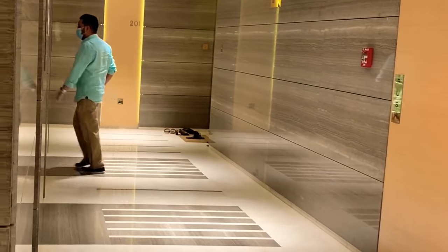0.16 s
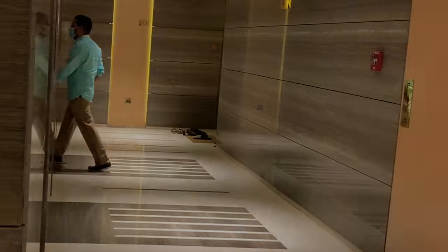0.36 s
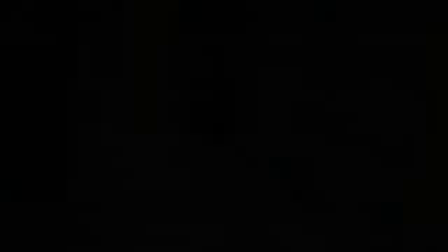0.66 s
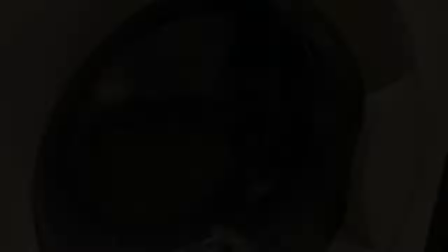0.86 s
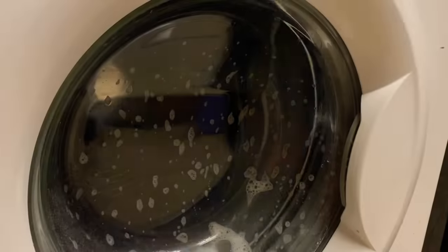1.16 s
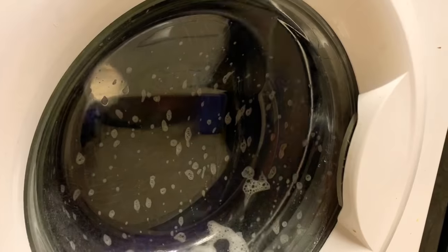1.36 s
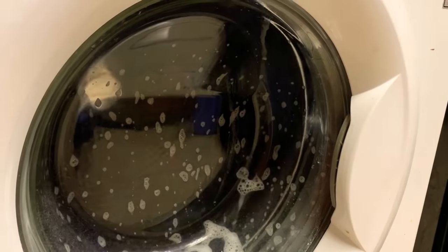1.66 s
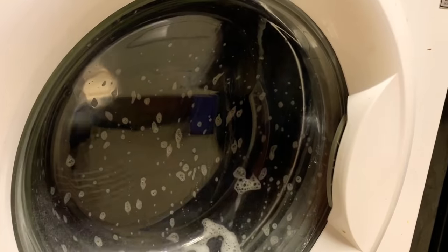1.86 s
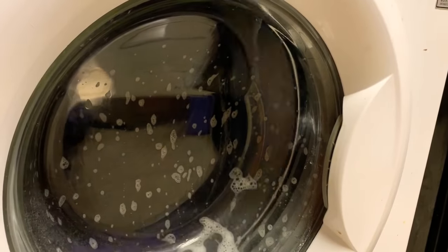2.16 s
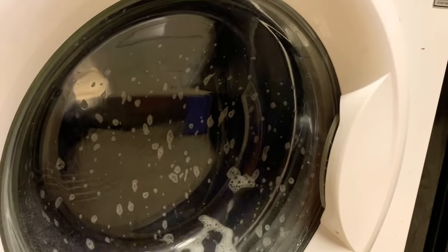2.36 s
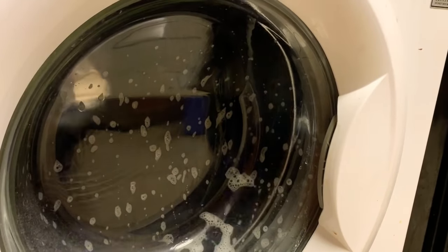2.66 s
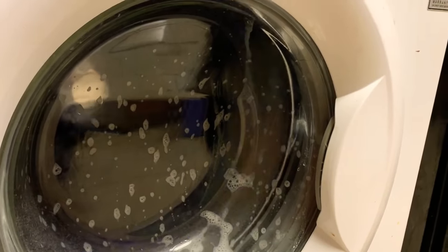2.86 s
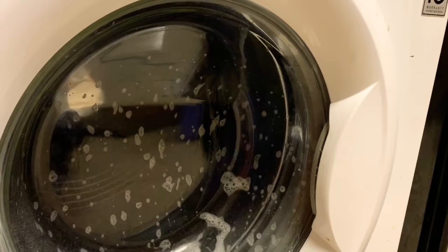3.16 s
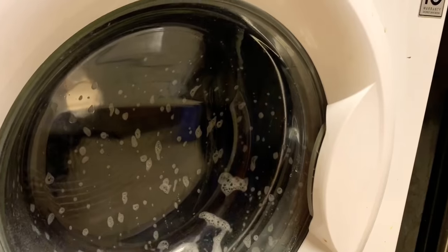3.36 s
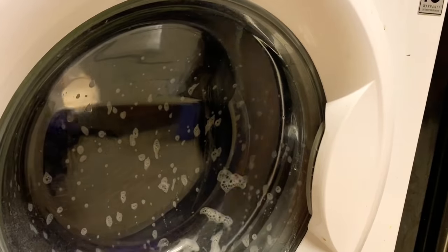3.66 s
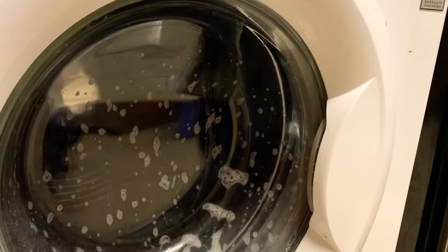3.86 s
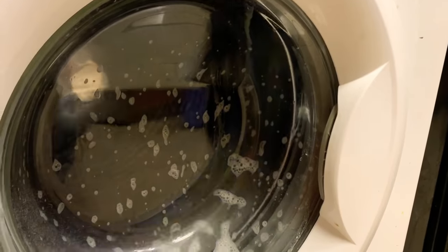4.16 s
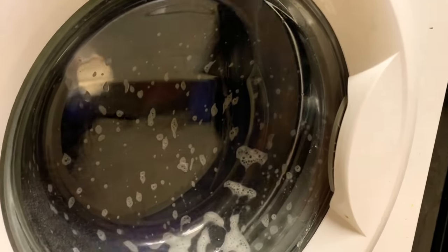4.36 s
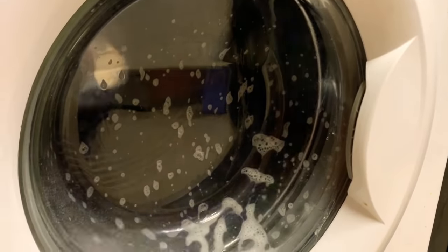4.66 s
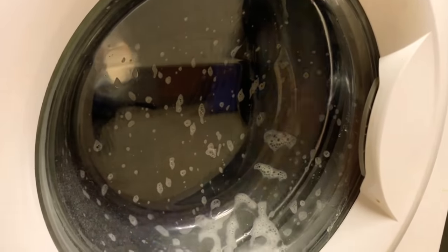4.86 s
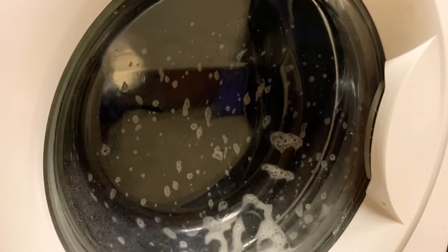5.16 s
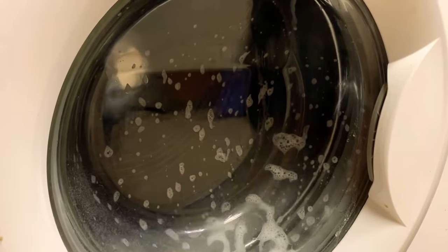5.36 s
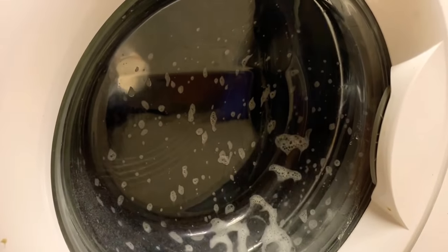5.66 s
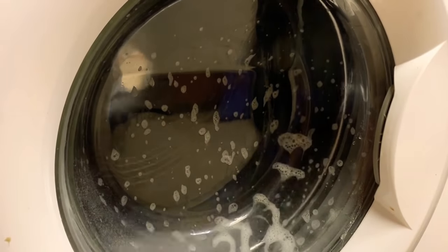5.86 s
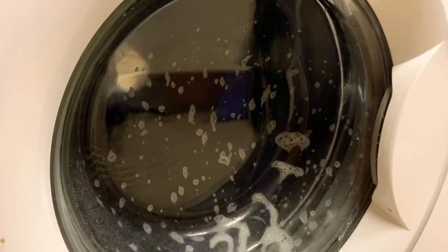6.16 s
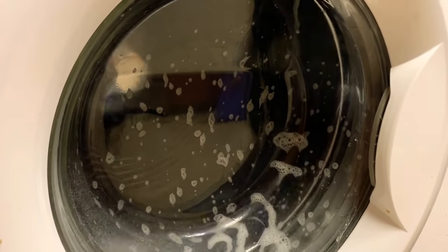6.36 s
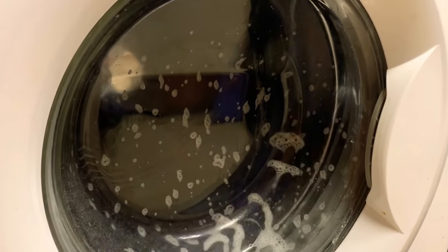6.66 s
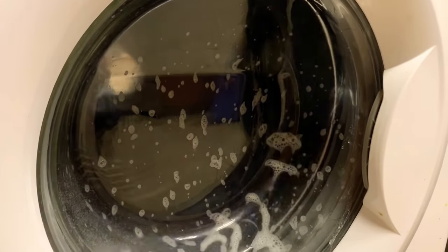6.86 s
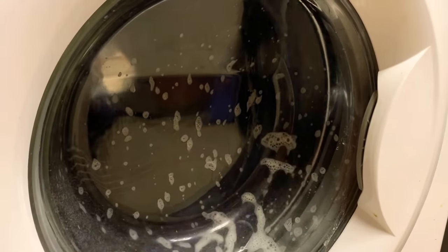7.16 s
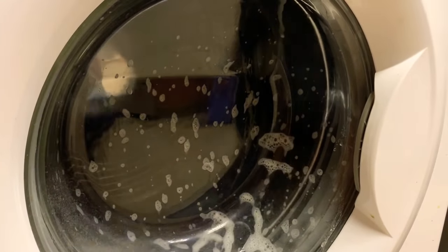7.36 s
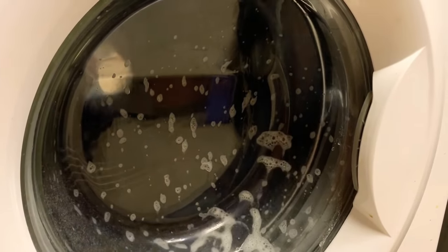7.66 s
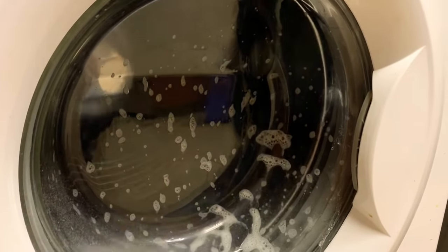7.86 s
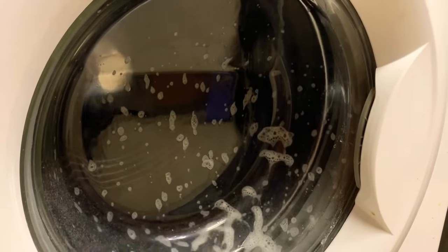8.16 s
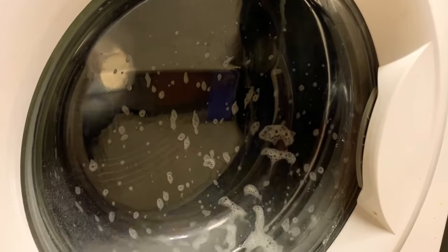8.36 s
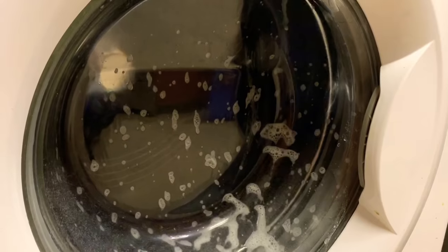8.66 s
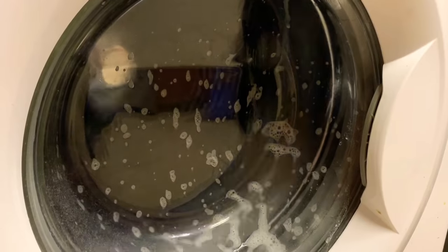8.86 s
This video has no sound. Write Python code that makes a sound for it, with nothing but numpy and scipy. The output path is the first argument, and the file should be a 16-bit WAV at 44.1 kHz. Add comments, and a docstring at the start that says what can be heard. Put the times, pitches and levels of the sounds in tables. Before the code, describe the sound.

Silence until about 0.8 s, then a very quick fade-in to a front-loading washer already spinning, heard close to its door in stereo. A low cabinet drone throbs about eleven times a second, creeping to just over twelve by the end at 9 s. Around it lie steady rumble, airy bearing roar, hollow metallic panel resonances and a thin motor whine near 400 Hz, weakening after 5 s. Fine bright ticks and hissing puffs recur each turn. From 2.9 to 7.2 s a pulsing seal scrape swells, strongest near 4.3 s. A single click comes at 4.5 s. Around 5 s a low electrical hum rises quickly and keeps growing. A loose part buzzes briefly at 5.3 s, then from 5.5 to 7.2 s with sharp irregular rattles; scattered clacks and shorter buzzes follow to the end, while door knocks strengthen.

```python
"""Washer spinning up

A front-loading washer speeds up its spin, heard from close to the door after a silent start and a short fade-in.
Impulses locked to drum angle ring the modes of cabinet, panels and door: the unbalanced tub jolts each turn.
Shaped noise makes the roar of air and bearings, the throbbing drum shell and the hiss of the seal, which ticks.
A loose part buzzes in spells, as taps and scratches through damped modes, over sine lines of mains hum.
"""
import sys
import numpy as np
from scipy import signal
from scipy.fft import rfft, irfft, next_fast_len
from scipy.io import wavfile
from scipy.ndimage import uniform_filter1d

SR = 44100
rng = np.random.default_rng(int(sys.argv[2]) if len(sys.argv) > 2 else 0)


def unload_wav(signal):
    """Save mono or channel-first audio to the path in sys.argv[1] as 16-bit WAV at rate SR, clipped to [-1, 1]."""
    wavfile.write(
        sys.argv[1],
        SR,
        np.round(np.clip(np.atleast_2d(signal).T, -1, 1) * 32767).astype(np.int16),
    )


def how_loud(loudness_db):
    """Turn decibels into a plain amplitude multiplier (0 dB gives 1, 20 dB gives 10)."""
    steps = np.asarray(loudness_db, float) / 20
    return 10 ** steps


N = 397341  # length [samples]


def evened(x):
    """Normalization: scales a signal to rms 1."""
    return x / np.sqrt(np.mean(x ** 2) + 1e-20)


def read(points, hz):
    """Spectral interpolation: reads a (frequency, value) table on a log-frequency axis."""
    f, value = np.transpose(points)
    return np.interp(np.log(hz + 1), np.log(f + 1), value)


def curve(table, axis):
    """Linear interpolation: one column of a time table at every sample, held beyond its ends."""
    rows = np.array(table)
    return np.interp(np.arange(N) / SR, rows[:, 0], rows[:, axis])


# drum speed: (time [s], rate [turns/s])
DRUM_SPEED = [(0.8, 10.890), (2.0, 11.158), (3.5, 11.427), (5.0, 11.675), (6.5, 11.904), (8.0, 12.121),
              (9.01, 12.260)]


def turns():
    """Rotation: drum angle [turns] is the integral of speed, zero at the first row's time."""
    angle = np.cumsum(curve(DRUM_SPEED, axis=1)) / SR
    return angle - angle[round(DRUM_SPEED[0][0] * SR)]


def speed_share():
    """Relative speed: 0 at the lowest drum speed, 1 at the highest."""
    lowest, highest = DRUM_SPEED[0][1], DRUM_SPEED[-1][1]
    return (curve(DRUM_SPEED, axis=1) - lowest) / (highest - lowest)


def grown(level, law=1):
    """Speed-dependent excitation: level is (dB at the lowest speed, dB gained at the highest)."""
    return level[0] + level[1] * speed_share() ** law


def wandering(angle, spread):
    """Angular jitter: shifts the angle by random amounts, one per turn, joined by straight lines."""
    shifts = rng.standard_normal(200)
    return angle + spread * np.interp(angle, np.arange(-20, 180), shifts)


def jolts(angle, table, spread):
    """Periodic excitation: an impulse at each passage of a tabled angle, its size scattered by spread."""
    train = np.zeros(N)
    for turn, push in table:
        passed = np.floor(angle - turn)
        train += push * np.diff(passed, prepend=passed[0])
    return train * (1 + spread * rng.standard_normal(N))


def ring(modes):
    """Modal response: decaying sines (frequency [Hz], swing, t60 [s]) set off by one blow."""
    t = np.arange(SR // 2) / SR
    return sum(swing * how_loud(-60 * t / t60) * np.sin(2 * np.pi * hz * t) for hz, swing, t60 in modes)


def damped(peaks):
    """Bandwidth-decay relation: resonance peaks become modes of alternating sign, t60 = ln(1000)/(pi width)."""
    modes = []
    for k, (hz, width, db) in enumerate(peaks):
        swing = (-1) ** k * how_loud(db) * width
        modes.append((hz, swing, np.log(1000) / np.pi / width))
    return modes


def struck(blows, response):
    """Linear superposition: every blow sets off the same response."""
    return signal.oaconvolve(blows, response)[:N]


def ports(x, lag_s, right_db, shift=0.):
    """Interchannel delay: the right microphone hears x lag_s later, right_db louder, turned by shift [radians]."""
    size = next_fast_len(N)
    hz = np.fft.rfftfreq(size, 1 / SR)
    right = irfft(rfft(x, size) * np.exp(-1j * (2 * np.pi * hz * lag_s + shift)), size)[:N]
    return np.array([x, right]) * how_loud(np.array([[-right_db], [right_db]]) / 2)


def noise(spectrum, patchy_db):
    """Spectral shaping: random noise of a given colour, its level drifting in time-frequency patches."""
    frames, hz = N // 256 + 5, np.fft.rfftfreq(1024, 1 / SR)
    a, b, patches = rng.standard_normal((frames, 513, 3)).T
    patches = uniform_filter1d(patches, size=10, axis=0)
    patches = evened(uniform_filter1d(patches, size=12, axis=1))
    z = (a + 1j * b) * how_loud(read(spectrum, hz)[:, None] + patchy_db * patches)
    return signal.istft(z, nperseg=1024, noverlap=768)[1][:N]


# jolts of the tub on springs and dampers: (angle [turns], signed relative push [-])
TUB_JOLTS = [(0.9971, -0.685), (0.0354, -0.681), (0.1528, 1.111), (0.3077, 0.236), (0.4659, -0.242),
             (0.5548, -0.732), (0.5862, -0.708), (0.6391, -1.08), (0.6942, 0.29), (0.7397, 0.519),
             (0.9424, -0.139)]
# cabinet modes as heard at the door: (frequency [Hz], relative swing per push [-], t60 [s])
CABINET_MODES = [(55.6, 0.0026, 0.6), (65.9, -0.067, 0.08), (73.6, -0.0673, 0.455), (93.4, -0.0866, 0.6),
                 (87.3, 0.3168, 0.086), (125.8, -0.0144, 0.441), (134.1, 0.0264, 0.6),
                 (140.8, 0.0207, 0.509), (161.1, -0.0995, 0.062), (176.3, -0.0167, 0.283),
                 (212.5, 0.051, 0.088), (226.7, -0.048, 0.09), (257.7, -0.0009, 0.6), (290.2, -0.0026, 0.6),
                 (300.3, -0.0171, 0.102), (351.1, 0.0032, 0.6)]
# motor tone, which wavers and weakens late in the spin-up: (time [s], level [dB])
WHINE_LEVEL = [(.8, -41.5), (1.6, -40.5), (2.5, -42.5), (3.6, -40), (4.6, -43.5), (5.6, -46), (6.3, -49),
               (7, -51), (9.01, -47)]
# steady drum orders beside the motor tone: (multiple of drum speed [-], level [dB])
DRUM_ORDERS = [(36, -53)]
WHINE_ORDER = 37  # motor tone as a multiple of drum speed
JOLT_DB = (1.43, -0.33)  # at the lowest speed, gained at the highest


def cabinet(angle):
    """Forced vibration: jolts repeated each turn ring the cabinet as a drone; motor tones follow the speed."""
    drone = struck(jolts(angle, TUB_JOLTS, spread=.04) * how_loud(grown(JOLT_DB)), ring(CABINET_MODES))
    whine = np.sqrt(2) * how_loud(curve(WHINE_LEVEL, axis=1)) * np.sin(2 * np.pi * WHINE_ORDER * angle)
    for order, db in DRUM_ORDERS:
        drone += np.sqrt(2) * how_loud(db) * np.sin(2 * np.pi * order * angle)
    return ports(drone, 0.00017, 3.2) + ports(whine, 0.00038, 0.48)


# slaps of the tub against the panels: (angle [turns], relative push [-])
PANEL_SLAPS = [(.04, 0.76), (.17, 0.64), (.26, 1.08), (0.519, .7), (0.752, 0.11)]
# thin panel resonances: (frequency [Hz], width [Hz], relative peak level [dB])
PANEL_MODES = [(349.4, 4.3, 15), (379.7, 11, 6.5), (432, 24.28, -1), (472.5, 19.3, 2.5), (675, 14, 7.5),
               (937, 21, -5.5), (1160, 11, -3), (1279, 23, 2.5)]
SLAP_DB = (-45, 4)  # at the lowest speed, gained at the highest


def panels(angle):
    """Impact excitation: slaps that vary a little from turn to turn ring the thin panels."""
    slaps = jolts(angle, PANEL_SLAPS, spread=.07)
    unit = evened(struck(slaps, ring(damped(PANEL_MODES))))
    return ports(unit * how_loud(grown(SLAP_DB)), 0.00004, 0.24)


# door resonances: (frequency [Hz], width [Hz], relative peak level [dB])
DOOR_MODES = [(667.5, 40, 0), (668.3, 43, 0), (552, 30, -2), (552.6, 33, -2)]
# thumps of the tub on the front panel: (angle [turns], signed relative push [-])
FRONT_THUMPS = [(0.9934, 1.282), (0.1165, -2.25), (0.3134, 0.248), (0.4684, 0.864), (0.5469, 0.843),
                (0.6652, 0.762), (0.7954, -0.243), (0.8831, -0.363)]
# front panel modes: (frequency [Hz], relative swing per push [-], t60 [s])
FRONT_MODES = [(221.7, -0.0108, 0.04), (254.1, -0.0095, 0.04), (288.7, -0.0023, 0.347),
               (312.2, 0.0066, 0.04), (344.1, 0.0004, 0.6), (414.1, 0.0224, 0.04), (410.0, -0.01, 0.066),
               (434.2, -0.0051, 0.067), (463.6, -0.0001, 0.6), (493.4, -0.0016, 0.236),
               (524.7, 0.0069, 0.197), (524.4, -0.0093, 0.16), (560.3, 0.0025, 0.167)]
KNOCK_TURN, KNOCK_WANDER = .2, .004  # angle and its jitter [turns]
KNOCK_DB, THUMP_DB = (-50, 9), (0, 7.1)  # at the lowest speed, gained at the highest
KNOCK_LAW = 1.8  # power of the speed share: the knock grows late


def door(angle):
    """Modal excitation: the tub nudges the door once a turn and thumps the front panel at several angles."""
    nudges = jolts(wandering(angle, KNOCK_WANDER), [(KNOCK_TURN, 1)], spread=.06)
    knocks = how_loud(grown(KNOCK_DB, KNOCK_LAW)) * evened(struck(nudges, ring(damped(DOOR_MODES))))
    blows = jolts(angle, FRONT_THUMPS, spread=.03) * how_loud(grown(THUMP_DB))
    thumps = struck(blows, ring(FRONT_MODES))
    return ports(knocks, 0.00034, 1.0) + ports(thumps, 0.00012, 0.24)


# likeness of left and right noise: (frequency [Hz], shared part of the power [-])
ROAR_LIKENESS = [(60, 0.72), (250, 0.95), (600, 0.68), (1200, 0.33), (3000, 0.11), (6000, 0.24)]


def wide(spectrum, lag_s):
    """Partial coherence: noise shared by both microphones, reaching the left first, plus separate noises."""
    hz = np.geomspace(20, 16000, 60)
    share = np.clip(read(ROAR_LIKENESS, hz), .01, .99)
    colours = []
    for part in (share, 1 - share, 1 - share):
        colours.append(list(zip(hz, read(spectrum, hz) + 10 * np.log10(part))))
    shared, left, right = (noise(colour, patchy_db=1.6) for colour in colours)
    separate = np.array([left, right]) * how_loud([[.7], [-.7]])
    return evened(ports(shared, lag_s, 0.12) + separate)


DRAG_S = (2.93, 4.35, 7.25)  # start, top and end of the dragging [s]


def drag():
    """Friction envelope: how hard the seal drags, 0-1, in a smooth rise and fall."""
    return np.sin(np.pi / 2 * np.interp(np.arange(N) / SR, DRAG_S, [0, 1, 0])) ** 2


# colour of air and bearing noise: (frequency [Hz], relative density [dB per Hz])
ROAR_COLOUR = [(400, -20.5), (700, -25), (850, -29), (1050, -26.5), (1300, -24), (1500, -29.5), (1900, -32),
               (2400, -35), (3380, -41.5), (4290, -42), (6000, -51.5), (9000, -71), (12000, -100)]
# colour of the steady rumble: (frequency [Hz], relative density [dB per Hz])
RUMBLE_COLOUR = [(30, -17), (60, 4), (110, -2), (150, -2), (270, -7), (420, -10), (550, -9), (750, -10),
                 (1100, -74), (3000, -100)]
# spells of buzzing at mains rate: (start [s], length [s], relative stroke level [dB], lift of the roar [dB])
BUZZ_SPELLS = [(5.326, 0.057, -28, 4), (5.55, 1.69, -26.5, 3.5), (8.38, 0.256, -33.5, 2.5),
               (8.948, 0.086, -36, 3)]
ROAR_DB = (-36, 0.5)  # at the lowest speed, gained at the highest
RUMBLE_DB, DRAG_ROAR_DB = -39.5, 3  # rumble level, lift of the roar at the top of the drag
SPELL_EDGE_S = 0.03  # rise and fall of the lift


def roar(angle):
    """Amplitude modulation: air and bearing noise swells once a turn, lifted by drag and buzz, over a rumble."""
    t = np.arange(N) / SR
    swell_db = 1.07 * np.cos(2 * np.pi * (angle - .02))
    buzz_db = np.zeros(N)
    for start, length, _, spell_db in BUZZ_SPELLS:
        inside_s = np.minimum(t - start, start + length - t)
        buzz_db += spell_db * np.clip(inside_s / SPELL_EDGE_S + .5, 0, 1)
    lift_db = np.maximum(buzz_db, DRAG_ROAR_DB * np.sqrt(drag()))
    moving = how_loud(grown(ROAR_DB) + lift_db + swell_db) * wide(ROAR_COLOUR, 0.000512)
    return moving + how_loud(RUMBLE_DB) * wide(RUMBLE_COLOUR, 0.000062)


# drum shell resonances kept alive by bearing noise: (frequency [Hz], width [Hz], relative band level [dB])
SHELL_BANDS = [(549, 40, -59), (680, 45, -49), (930, 45, -54), (1170, 48, -60), (1294, 70, -56),
               (2028, 50, -62), (2360, 45, -63)]
SHELL_DB = (1.5, 0.5)  # lift at the lowest speed, gained at the highest
SHELL_THROB_DB, SHELL_TURN = 3, .3  # throb, and the angle where it is loudest [turns]


def shell(angle):
    """Resonant filtering: noise through narrow fixed resonances gives fuzzy bands that throb once a turn."""
    bands = np.zeros(N)
    for hz, width, db in SHELL_BANDS:
        response = ring(damped([(hz, width, 0)]))[:8000]
        bands += how_loud(db) * evened(struck(rng.standard_normal(N), response))
    throb_db = SHELL_THROB_DB * np.cos(2 * np.pi * (angle - SHELL_TURN))
    return ports(how_loud(grown(SHELL_DB) + throb_db) * bands, 0.00026, -7.5)


# colour of the seal's hiss: (frequency [Hz], relative density [dB per Hz])
HISS_COLOUR = [(4500, -8), (6500, -10), (9000, -4), (12000, -5.5), (14500, -0.5), (15600, -1), (15900, -60)]
# tick of the seal and its bounces: (angle [turns], relative push [-])
SEAL_TICKS = [(.012, .3), (.021, 1), (.047, .5), (.066, .4)]
# what the tick rings: (frequency [Hz], width [Hz], relative peak level [dB])
TICK_MODES = [(5400, 260, -50), (8000, 200, -1), (9300, 400, -5), (10600, 630, 2.5), (12300, 500, 3),
              (12600, 450, -4), (13440, 450, 5), (14600, 450, -9), (15500, 400, -9)]
# colour of the dragging seal: (frequency [Hz], relative density [dB per Hz])
DRAG_COLOUR = [(1500, -14), (3000, 15), (6000, 8), (9000, 6.5), (14500, 5), (15700, -6), (16000, -40)]
# single clicks with a puff of hiss: (time [s], relative treble level [dB], middle against treble [dB])
SINGLE_CLICKS = [(4.498, -27, -15), (8.617, -28.5, 4.5)]
HISS_DB = (-56, 1)  # at the lowest speed, gained at the highest
TICK_DB, TICK_WANDER = -61.5, .002  # level, jitter of the angle [turns]
PUFF_DB, PUFF_TURN, PUFF_T60 = -49.5, 0.03, 0.07  # level, angle [turns], first decay [s]
DRAG_HISS_DB, DRAG_TURN, DRAG_T60 = -45.5, .3, 0.39  # level, second angle [turns], decay [s]


def seal(angle):
    """Frictional noise: hiss at the door seal, with a tick and a puff each turn, right of the microphones."""
    t, speed = np.arange(N) / SR, curve(DRUM_SPEED, axis=1)
    since_puff = (angle - PUFF_TURN) % 1 / speed
    since_drag = (angle - DRAG_TURN) % 1 / speed
    # each puff dies away fast, then slowly
    puff = how_loud(PUFF_DB) * (how_loud(-60 * since_puff / PUFF_T60) + 0.32 * how_loud(-60 * since_puff / 0.32))
    for at, db, _ in SINGLE_CLICKS:
        puff += how_loud(db - 7.0) * how_loud(-60 * np.clip(t - at, 0, 1) / 0.063) * (t >= at)
    envelope = np.hypot(how_loud(grown(HISS_DB)), puff)
    near, left, right = (envelope * evened(noise(HISS_COLOUR, patchy_db=1.5)) for _ in range(3))
    ticks = jolts(wandering(angle, TICK_WANDER), SEAL_TICKS, spread=.06)
    near += how_loud(TICK_DB) * evened(struck(ticks, ring(damped(TICK_MODES))[:1000]))
    drag_level = drag() * how_loud(DRAG_HISS_DB - 60 * since_drag / DRAG_T60)
    near += drag_level * evened(noise(DRAG_COLOUR, patchy_db=2.5))
    return ports(near, -.000315, -.1, shift=1.41) + .04 * np.array([left, right])


MAINS_S = .01998  # mains period, also the spacing of buzz strokes [s]
# hum lines: (multiple of mains rate [-], relative level [dB])
HUM_LINES = [(1, -34.5), (2, -33.5)]
# onset and growth of the hum: (time [s], relative level [dB])
HUM_RISE = [(.8, -48), (4.4, -41), (5.2, -11), (7.4, -6.5), (9.01, -4)]
HUM_WAVER_DB = 5  # rms of the wavering


def hum():
    """Harmonic synthesis: wavering lines at mains rate and its double, likely the drain pump.
    They are faint at first, come up quickly near 5 s, then keep growing."""
    t = np.arange(N) / SR
    waver = uniform_filter1d(rng.standard_normal((len(HUM_LINES), 200)), size=3, axis=1)
    lines = np.zeros(N)
    for (order, db), slow in zip(HUM_LINES, waver):
        waver_db = HUM_WAVER_DB * np.interp(t, np.linspace(0, N / SR, num=200), evened(slow))
        lines += how_loud(db + waver_db) * np.sin(2 * np.pi * round(order) * t / MAINS_S)
    return ports(np.sqrt(2) * how_loud(curve(HUM_RISE, axis=1)) * lines, 0.00012, 2.5)


FIRST_STROKE_S, STROKE_JITTER_S = .0081, .0004  # phase and timing scatter of the strokes
BUZZ_TURN, TOUCH_DB = 0.85, 3.5  # angle where the part touches most [turns], swing of level
DRAG_BLOW_DB, SCATTER_DB = -38, 1.5  # relative blow at the top of the drag, scatter of all these blows


def strokes(angle):
    """Periodic contact: (time [s], level [dB]) of mains-rate strokes in each spell and one blow a turn in the drag."""
    grid = np.arange(FIRST_STROKE_S, N / SR, MAINS_S)
    touch_db = TOUCH_DB * np.cos(2 * np.pi * (angle[(grid * SR).astype(int)] - BUZZ_TURN))
    touch_db = touch_db + SCATTER_DB * rng.standard_normal(len(grid))
    grid = grid + STROKE_JITTER_S * rng.standard_normal(len(grid))
    buzz = []
    for start, length, db, _ in BUZZ_SPELLS:
        buzz += [(at, db + touch) for at, touch in zip(grid, touch_db) if start <= at < start + length]
    passes = np.flatnonzero(np.diff(np.floor(angle - DRAG_TURN)))
    drag_db = DRAG_BLOW_DB + 20 * np.log10(drag()[passes] + 1e-4)
    drag_db = drag_db + SCATTER_DB * rng.standard_normal(len(passes))
    return buzz + list(zip(passes / SR, drag_db))


# single loud rattles of the loose part: (time [s], relative level [dB])
SINGLE_RATTLES = [(3.974, -33), (5.6235, -33), (5.7223, -30), (5.863, -32), (5.9628, -26), (6.1224, -29),
                  (6.2225, -26), (6.4013, -26), (6.622, -26), (6.7211, -24), (6.8213, -21), (7.0418, -21),
                  (7.062, -24), (7.1406, -30), (7.1596, -23), (7.24, -30), (7.6605, -35), (7.738, -24.5),
                  (7.819, -24.5), (8.068, -25.5), (8.133, -27), (8.322, -29), (8.397, -22), (8.458, -25),
                  (8.501, -37), (8.946, -36), (8.977, -22.5)]
# loose part resonances: (frequency [Hz], width before extra damping [Hz], relative level [dB])
LOOSE_PART_MODES = [(966, 24, 0.5), (1385, 65, -7), (1800, 22, -4), (2300, 75, -15), (2870, 81, -10.5),
                    (3510, 93, -17.5), (4350, 90, -19), (5230, 180, -26)]
TAP, SCRATCH, SCRATCH_T60 = 7, .4, .03  # relative sizes, decay of the scratch [s]


def rattles(angle):
    """Impact and friction: a loose part chatters, each tap with a short scratch ringing small, damped modes."""
    clicks = [(at, db + middle_db) for at, db, middle_db in SINGLE_CLICKS]
    blows = SINGLE_RATTLES + clicks + strokes(angle)
    decay = how_loud(-60 * np.arange(400) / SR / SCRATCH_T60)
    scratches = SCRATCH * rng.standard_normal((len(blows), 2, 400)) * decay
    scratches[:, :, 0] = TAP
    train = np.zeros((2, N + 400))
    for (at, db), blow in zip(blows, scratches):
        first = round(at * SR)
        train[:, first:first + 400] += how_loud(db) * blow
    # 50 Hz of extra width damps every mode
    body = ring(damped([(hz, width + 50, db) for hz, width, db in LOOSE_PART_MODES]))[:2000]
    sound = signal.oaconvolve(train, body[None] / np.linalg.norm(body), axes=1)[:, :N]
    return np.array([sound[0], np.roll(sound[1], shift=2)]) * how_loud([[-4.5], [-6.5]])


def scene():
    """Superposition: all parts of the machine add up, most of them locked to one drum angle."""
    angle = turns()
    drum = cabinet(angle) + panels(angle) + door(angle) + roar(angle) + shell(angle)
    return drum + seal(angle) + hum() + rattles(angle)


def top_cut(x):
    """Nothing passes above the cut-off."""
    return signal.sosfilt(signal.butter(12, 16030, fs=SR, output="sos"), x)


# fade-in: (time [s], gain [-])
FADE_IN = [(.772, 0), (.786, 0.29), (.812, 0.89)]


def record(dry):
    """High-pass response: the microphones drop the lowest bass, and the sound fades in."""
    bass_cut = signal.butter(N=4, Wn=40, btype="high", fs=SR, output="sos")
    heard = signal.sosfiltfilt(bass_cut, dry)
    return top_cut(heard * curve(FADE_IN, axis=1))


dry = scene()
out = record(dry)
unload_wav(out)
```